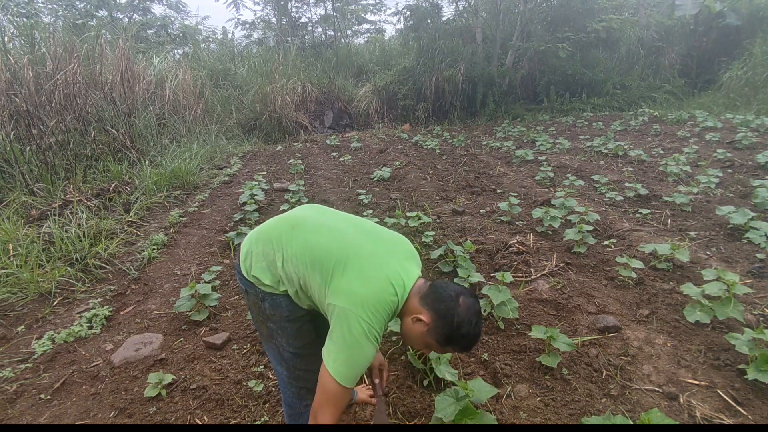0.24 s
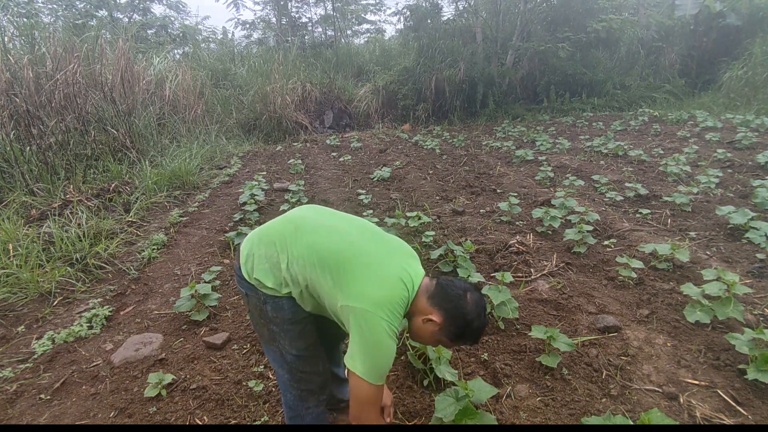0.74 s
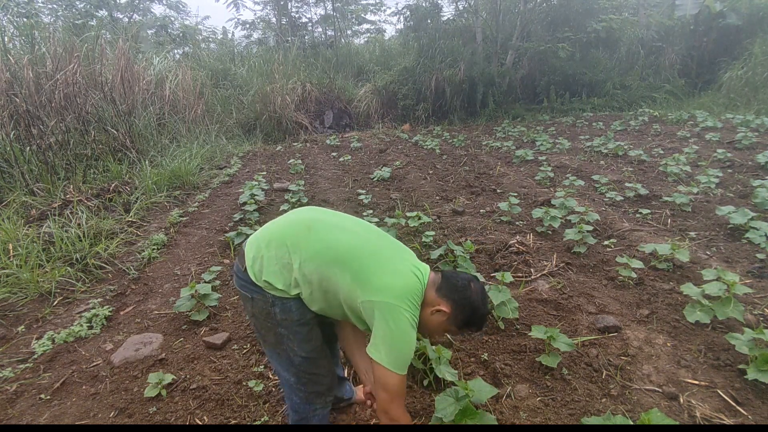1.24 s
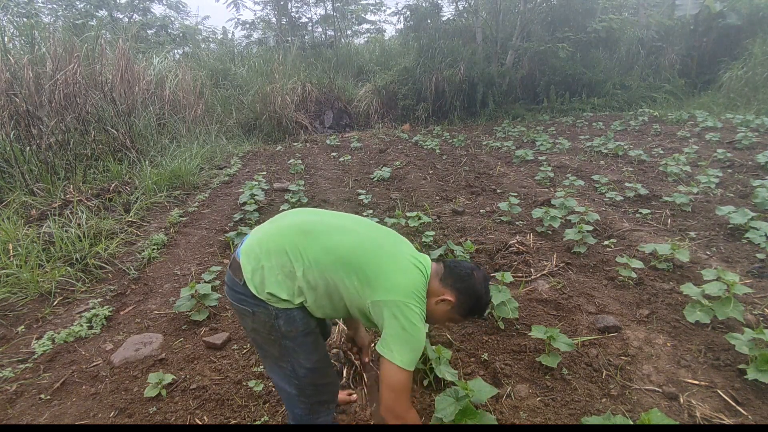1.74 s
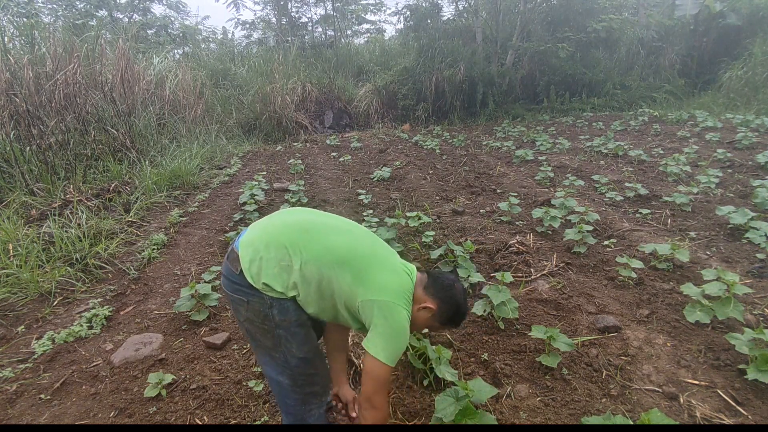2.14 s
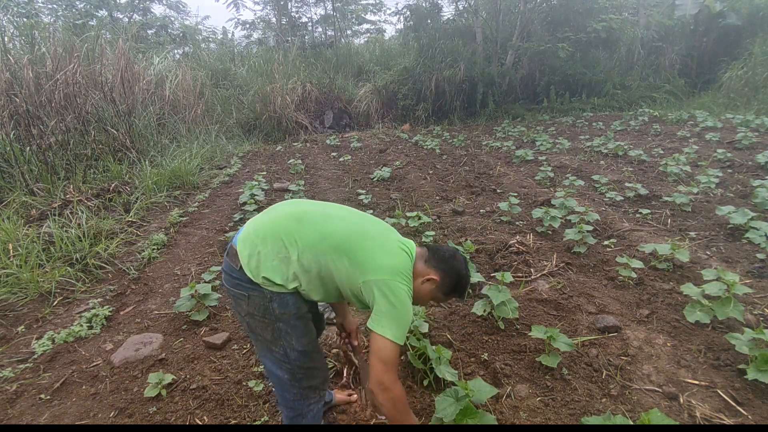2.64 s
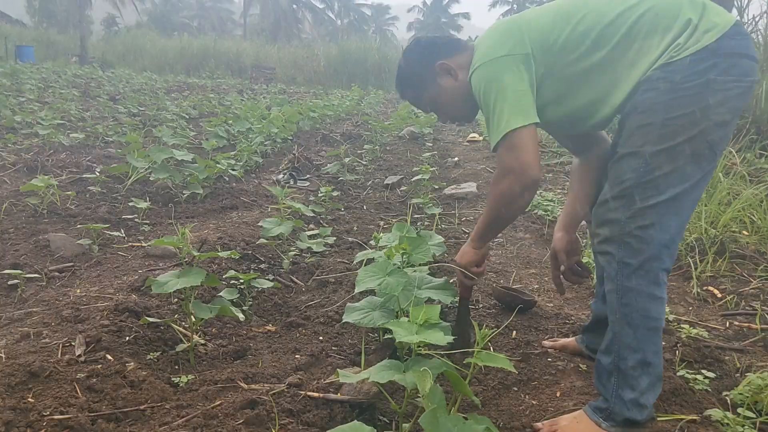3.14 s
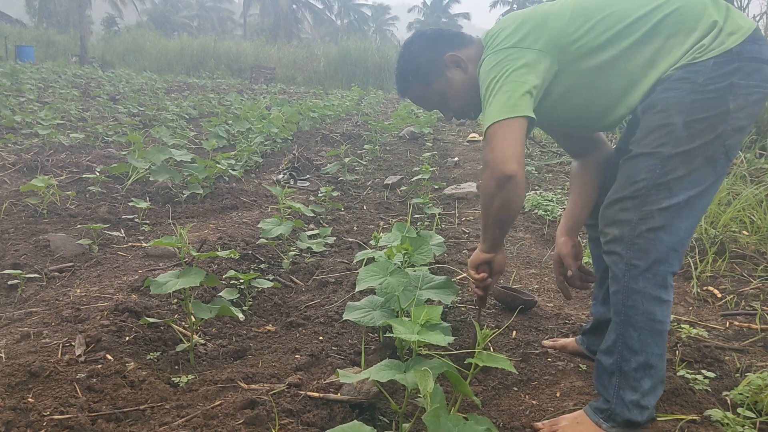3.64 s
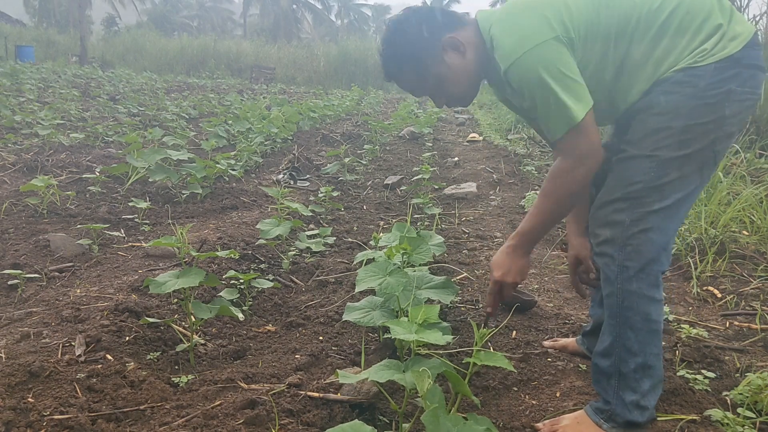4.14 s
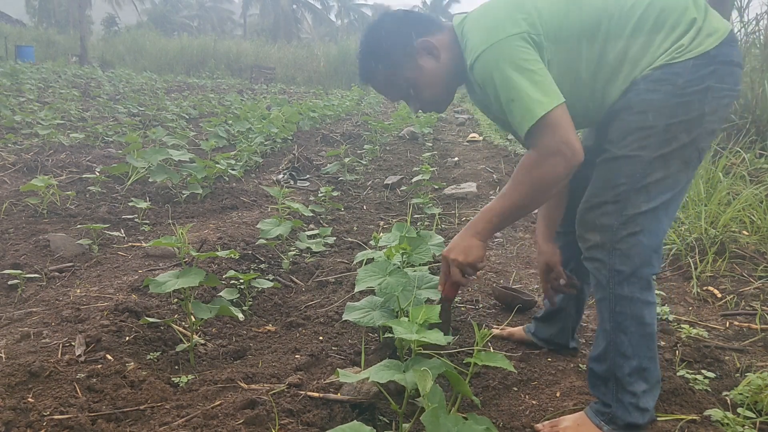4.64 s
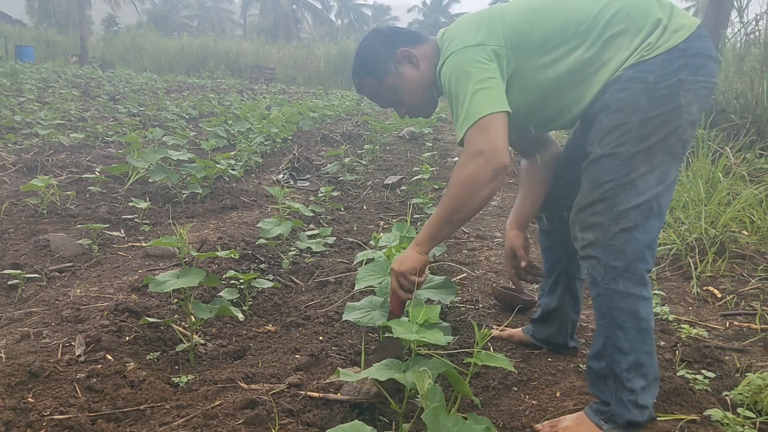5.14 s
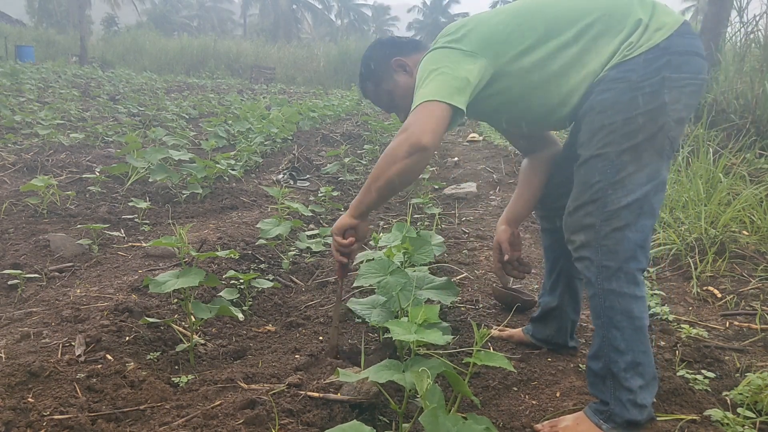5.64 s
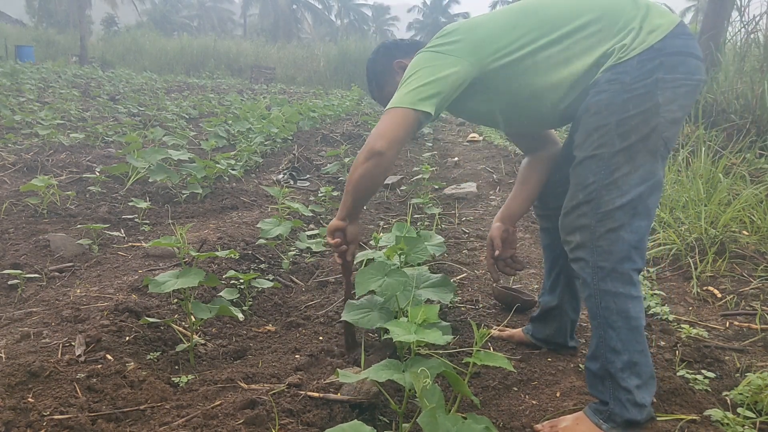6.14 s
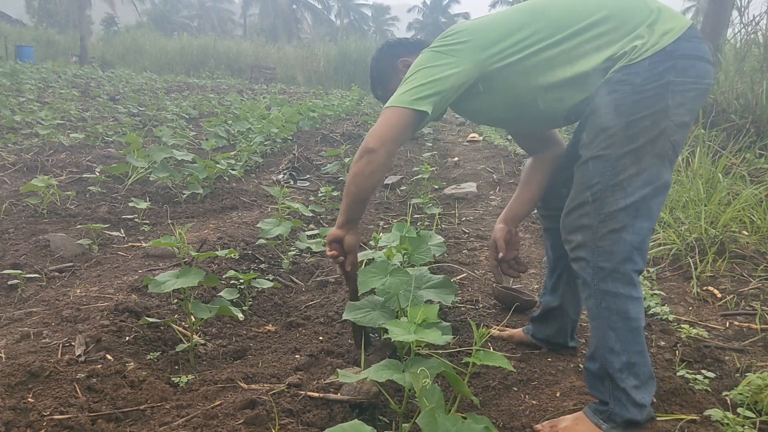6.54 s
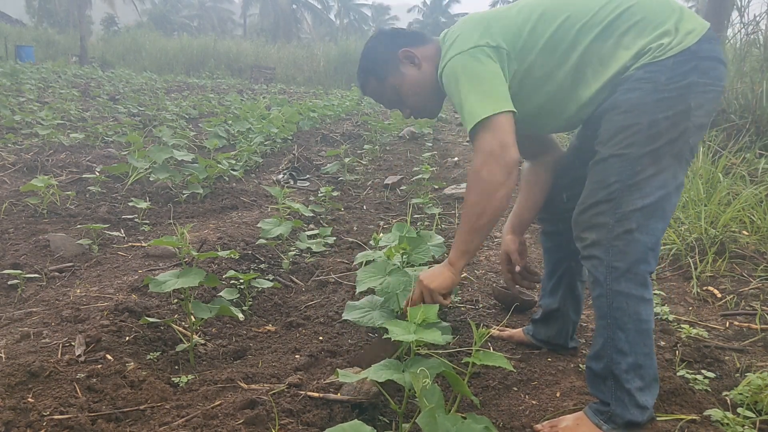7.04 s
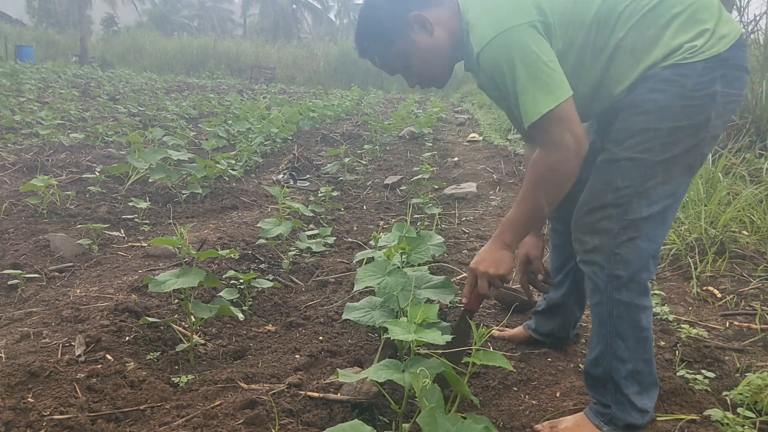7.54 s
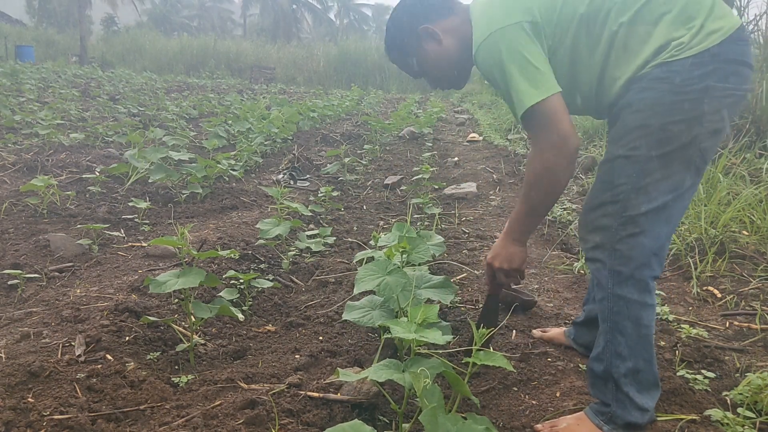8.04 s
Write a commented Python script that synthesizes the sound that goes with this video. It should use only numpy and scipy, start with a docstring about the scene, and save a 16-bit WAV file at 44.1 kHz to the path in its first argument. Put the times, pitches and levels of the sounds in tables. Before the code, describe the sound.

Steady rain on a vegetable field, with close drops thudding and ticking irregularly over leaf patter and a soft hiss.

```python
"""A vegetable field in steady rain, heard through the two microphone ports of a small camera out in it.
Drops land on and beside the camera, each a soft thud of sagging pitch, a hollow tap and a hard tick.
Close by, drops pat on leaves that give way. Further off, smaller ones patter on leaves and soil and
tiny droplets tick, over the hiss of the whole field and a low stir of air.
A brief silence marks an edit."""
import sys
import numpy as np
from scipy import signal
from scipy.fft import rfft, irfft
from scipy.io import wavfile
from scipy.ndimage import uniform_filter1d

SR = 44100
rng = np.random.default_rng(int(sys.argv[2]) if len(sys.argv) > 2 else 0)


def generate_wav(signal):
    """Clip the signal to [-1, 1] and save it as 16-bit WAV at the path in sys.argv[1]."""
    frames = np.transpose(np.atleast_2d(signal))
    scaled = np.clip(frames, -1, 1) * 32767
    pcm = np.round(scaled).astype(np.int16)
    wavfile.write(sys.argv[1], SR, pcm)


N = 365148
DROP_T = np.arange(1800) / SR  # seconds within one drop

# The soft push of a drop, a narrow plop. Each row: multiple of the thud pitch, level in dB.
THUD = [(.15, -45.5), (.35, -18), (.6, -1.5), (1, 2), (1.5, -1.5), (2.3, -14), (5, -46.5), (15, -71.5)]
# Resonance of the struck spot. Each row: multiple of the tap pitch, level in dB.
TAP = [(.12, -40.5), (.35, -15), (.6, -5.5), (1, 0), (1.55, -6), (2.3, -15.5), (4.5, -21.5), (12, -33.5)]
# Colour of the first contact. Each row: frequency in Hz, dB for a hard drop, dB for a soft one.
TICK = [(300, -13, -13), (2000, -4, -13.5), (4000, -2, -7.5), (6000, -1, -7), (9000, 2, 0.5),
        (16000, 2, -2)]


def near_drops(thud_db=1.9, tap_db=2.5, tick_db=0.83, knock_db=-18.0, detune=1.55, soft_db=9):
    """Drops right at the camera: a thud, a tap and a tick, each as strong as the struck spot allows."""
    # Each row: start in seconds, thud in dB, thud pitch in Hz, tap in dB, tap pitch in Hz, tick in dB,
    # splash against first contact in dB, left minus right in dB. The keywords trim the three levels.
    drops = [(0.2915, -32.5, 232, -48, 1100, -38, 4, -7), (0.3023, -22, 420, -39, 1730, -35, -2, 34),
             (0.321, -34.5, 466, -42, 950, -38, 0, 7), (0.3394, -43, 360, -38.5, 1860, -34.5, -3, 16),
             (0.3988, -42, 274, -35, 1750, -31.5, 0, -18), (0.4052, -51, 400, -42, 1910, -36, 14, -5),
             (0.4341, -30, 400, -39, 1120, -28, 4, 6), (0.4648, -35.5, 224, -36, 590, -32.5, 1, 0),
             (0.6836, -39, 297, -31, 1450, -36.5, -4, 20), (0.8103, -24, 333, -31, 570, -25.5, -5, -3.5),
             (0.9223, -26, 260, -32.5, 710, -34, -6, -9), (1.0065, -33, 251, -41, 950, -32.5, -3, 4.5),
             (1.2312, -29.5, 219, -37.5, 1300, -37, 15, 1), (1.3767, -42, 302, -34, 1460, -25, -14, 20),
             (1.462, -39.5, 282, -38.5, 654, -20.5, -9, 14), (1.4958, -44.5, 285, -43.5, 1150, -38.5, 4, 1),
             (1.7251, -36.5, 560, -31.5, 2040, -21, -9, 2), (1.7547, -34.5, 800, -25.5, 3640, -57, -13, 41),
             (1.802, -36, 337, -27, 950, -25.5, 2, -12), (1.8347, -43, 345, -33.5, 1780, -35, -1, -12),
             (1.949, -60, 310, -50, 3900, -22.5, 4, 13.5),
             (1.9631, -21.5, 216, -28.5, 1150, -32, 2.5, -1.5),
             (2.0932, -38.5, 644, -30, 2120, -26.5, -2, 13), (2.1444, -26, 230, -34, 1060, -30, 0, -1),
             (2.176, -34.5, 580, -24, 1700, -29, 9, 33), (2.306, -38.5, 186, -29.5, 1137, -33, -14, 0),
             (2.4376, -38, 433, -44, 1890, -30.5, 22, 18), (2.5666, -38, 392, -28, 1400, -27.5, -4, -17),
             (2.7924, -34.5, 326, -36, 617, -43, 0.5, 0), (2.8077, -39, 476, -29, 1410, -21, -7, 19),
             (2.9626, -57, 240, -44.5, 1070, -38.5, -10, -6), (2.9791, -53, 400, -40, 1750, -40, 2, -12),
             (2.9919, -45, 353, -34.5, 1060, -32, -24, -7), (3.025, -30.5, 222, -41, 1260, -32.5, 5, 0),
             (3.0413, -27.5, 660, -34.5, 3220, -32, -11, -27), (3.112, -33, 207, -42, 1330, -30, 18, -9),
             (3.1462, -45, 350, -43.5, 1310, -38, 0, -6), (3.2243, -51, 190, -40, 1140, -26, 0, -11),
             (3.3308, -21.5, 217, -31, 1160, -24, -8, -1), (3.4482, -52, 290, -44, 790, -32.5, 4, -11),
             (3.516, -39, 400, -33.5, 1650, -26.5, -8, 15), (3.5232, -49, 390, -34, 1890, -19.5, 2, 10.5),
             (3.5903, -32.5, 407, -49, 1650, -28, -2, -18), (3.6722, -56, 387, -42.5, 1280, -36, -1, 0.5),
             (3.731, -64, 350, -42, 3400, -47, -5, -13), (3.8063, -23.5, 192, -29, 600, -32.5, 2, -6.5),
             (4.02, -68, 300, -70, 2500, -35.5, -4, -5), (4.332, -35, 430, -38, 890, -30, 2, 28),
             (4.4525, -34.5, 270, -39.5, 600, -38, 3, 0.5), (4.5285, -21, 786, -29, 2200, -29, -16, 14),
             (4.6452, -51, 400, -44.5, 980, -33.5, -1, 0), (4.723, -30.5, 484, -31.5, 1750, -18.5, 4, 9.5),
             (4.761, -51, 270, -39, 910, -34, 6, -35), (4.784, -41.5, 220, -38, 610, -31, 6, -35),
             (4.911, -29, 536, -37.5, 1270, -34.5, 4, -8), (5.0216, -66, 240, -41, 1520, -34, -3, -16),
             (5.0367, -49, 293, -37.5, 1230, -22, -19, -6), (5.0578, -41, 367, -23, 1220, -50, -11, -7.5),
             (5.1276, -40, 453, -37, 1080, -30, -15, -25), (5.2782, -43.5, 142, -43.5, 600, -39, 5, -19),
             (5.3675, -49, 530, -35, 2020, -29.5, -12, 9.5), (5.413, -42.5, 180, -35, 1260, -35, 17, -5.5),
             (5.5885, -48, 430, -40, 920, -35, -3, 0), (5.6572, -50, 210, -44, 715, -40, 6, -16),
             (5.851, -30, 450, -31.5, 1590, -24, 2, 18), (5.8714, -38.5, 583, -36, 2170, -40, 21, -0.5),
             (5.9851, -36, 473, -26, 890, -37, -8.5, -26), (6.0072, -38, 520, -30.5, 1940, -20, -8, 16),
             (6.0177, -42, 230, -40, 1060, -32, 7, -7), (6.038, -42.5, 347, -50, 1000, -37, -2, -3),
             (6.0544, -44, 330, -36.5, 1140, -21.5, -6, -4), (6.1002, -27.5, 630, -29, 1980, -26, -14, 18),
             (6.1445, -36, 654, -31, 1050, -57, -10, 35), (6.1523, -32.5, 246, -47, 890, -31.5, 4, 0),
             (6.3031, -31, 245, -39, 1080, -28, 18, -0.5), (6.3104, -29.5, 493, -33.5, 1140, -18.5, 1, 24),
             (6.3331, -45, 190, -39, 640, -37, -5, -35), (6.3821, -19.5, 385, -30.5, 1180, -35, -6, -13),
             (6.4305, -42, 570, -28, 1085, -45, -15, 11), (6.4445, -37.5, 457, -34, 930, -53, -13, -24),
             (6.5754, -63, 241, -37.5, 1110, -24, 6, -7), (6.7369, -52, 261, -53, 2190, -20, -8, 16),
             (6.7448, -46, 250, -51, 930, -31.5, 4, -6), (6.7968, -44, 210, -47, 604, -34, 4, -3),
             (6.8176, -30.5, 380, -31.5, 1940, -34, -14, -26),
             (6.9532, -23.5, 223, -32, 1210, -27, 2, -11.5), (7.1005, -47, 490, -41, 1370, -32, -1, 10),
             (7.113, -39.5, 317, -41, 1230, -42, -1, 0), (7.1276, -33.5, 288, -41, 1350, -37, 1, -22),
             (7.234, -50, 400, -43, 2090, -33, -4, -8), (7.2514, -39, 197, -36, 646, -30.5, 13, -9),
             (7.267, -35.5, 650, -31, 1530, -24, -12, 17), (7.3153, -27, 352, -44, 1550, -38, -1, -22),
             (7.3482, -40, 560, -36, 1680, -31.5, -14, 14), (7.4405, -43, 274, -38, 840, -23.5, -8, -7),
             (7.4525, -35, 295, -25.5, 2420, -22, -12, 3), (7.5589, -31.5, 433, -36.5, 1800, -32, 8, 7),
             (7.5663, -43, 247, -44, 593, -40, 2, 9), (7.6012, -26, 405, -41, 1190, -46, -5, 24),
             (7.6925, -28.5, 380, -41, 1290, -55, -7, -19), (7.7849, -29, 626, -39, 2050, -26.5, -13, 18),
             (7.8361, -35.5, 230, -34, 1060, -35.5, -7.5, -0.5),
             (7.884, -35.5, 212, -31.5, 1140, -23, -2, 0), (7.9362, -40, 357, -36, 1100, -20, 4.5, -1),
             (7.9949, -36, 670, -27.5, 2030, -30, -1, 18), (8.0109, -21.5, 254, -31.5, 1390, -26.5, -7, -2),
             (8.041, -49, 390, -37, 1940, -25, -1, 35), (8.138, -46, 400, -30, 1670, -32, 5, -23),
             (8.1476, -44, 482, -63, 4000, -14, -16, 28), (8.1767, -41.5, 390, -53, 3150, -36, 7, -12),
             (8.248, -48, 245, -28.5, 1800, -29.5, 2, -32)]
    out = np.zeros((2, N))
    hard, soft = causal(TICK), causal(TICK, column=2)
    for start, low_db, thud_hz, mid_db, tap_hz, high_db, splash_db, side_db in drops:
        place, thud_lag, tap_lag = rng.random(3)
        near = plop(THUD, thud_hz)
        far = plop(THUD, thud_hz * detune ** (2 * place - 1))
        thud = np.array([near, far] if side_db > 0 else [far, near])
        thud = far_port_later(thud, side_db, thud_lag / thud_hz)
        thud += amp(knock_db) * min(300 / thud_hz, 1) ** 2 * mount_knock()  # deep thuds shake it most
        tap = strike(plop(TAP, tap_hz), splash_db, splash_s=0.0025)
        tap = far_port_later(tap, side_db, tap_lag / tap_hz)
        softness = np.clip((low_db - high_db) / soft_db, 0, 1)  # soft when the thud outweighs the tick
        tick = strike((1 - softness) * hard + softness * soft, splash_db, splash_s=0.0018)
        tick = far_port_later(tick, side_db, tap_lag * 0.0003)
        tick_side_db = 0.89 * side_db - 4.5  # follows the drop, leaning a little to the right
        add(out, start, pan(side_db) * (amp(low_db + thud_db) * thud + amp(mid_db + tap_db) * tap))
        add(out, start, pan(tick_side_db) * amp(high_db + tick_db) * tick)
    return out


def plop(shape, hz, damped_below_hz=400.0):
    """A brief resonance whose low edge rings longest, so the pitch sags; deep ones are broader."""
    steepness = min(hz / damped_below_hz, 1) ** .5
    spectrum = [(multiple * hz, db * steepness if multiple < 1 else db) for multiple, db in shape]
    return unit_hit(causal(spectrum, size=4096)[:len(DROP_T)])


def strike(colour, splash_db, splash_s):
    """One clean contact, then the water splashes; each port hears its own splash."""
    splash = np.exp(-DROP_T / splash_s) * rng.standard_normal((2, len(DROP_T)))
    force = amp(splash_db) * splash / np.linalg.norm(splash, axis=1, keepdims=True)
    force[:, 0] = 1  # the contact
    return np.array([unit_hit(signal.fftconvolve(side, colour)[:len(DROP_T)]) for side in force])


def mount_knock(hz=217.7, spread=0.393, rise_s=0.016, t60_s=0.052):
    """The camera mount rings on briefly after a drop, at a pitch that varies from hit to hit."""
    pitch = hz * np.exp(spread * (2 * rng.random((2, 1)) - 1))
    swing = np.sin(2 * np.pi * pitch * DROP_T) * (1 - np.exp(-DROP_T / rise_s))
    decay = np.exp(-np.log(1000) * DROP_T / t60_s)
    return np.array([unit_hit(side) for side in swing * decay])


def far_port_later(sound, side_db, delay_s):
    """The port away from the drop hears it later, through the casing."""
    late = np.pad(sound, ((0, 0), (int(abs(delay_s) * SR), 0)))[:, :sound.shape[1]]
    return np.array([sound[0], late[1]] if side_db > 0 else [late[0], sound[1]])


def leaf_pats(splash_db=2.0, splash_s=0.0017, tick_db=-44.5, tick_scatter_db=3.0):
    """Drops on the nearest leaves: the leaf gives way, so the pat is round and its tick is faint."""
    # Each row: start in seconds, level in dB, pitch in Hz, left minus right in dB.
    pats = [(0.702, -44, 360, -2), (0.726, -41.5, 1040, -2), (1.359, -40.5, 800, 5), (1.4, -38.5, 320, -7),
            (1.557, -39.5, 910, 6), (1.634, -44.5, 910, 6), (1.6571, -38, 1050, -9),
            (2.003, -41.5, 690, -19), (2.451, -39.5, 1040, 8), (3.195, -41, 540, -22),
            (3.216, -42, 418, -30), (3.2812, -37, 282, -17), (3.5368, -32.5, 1160, -26),
            (3.692, -43, 1020, -13), (3.8317, -30.5, 557, -4), (4.117, -40.5, 760, 0.5),
            (4.442, -40, 583, -20), (4.568, -41.5, 790, -19), (4.655, -41, 940, 18),
            (4.6897, -29.5, 860, 21), (4.7325, -34, 880, 13), (5.202, -43.5, 1020, 6),
            (5.2944, -33.5, 1560, -19), (5.3559, -33, 464, 25), (5.3847, -32, 770, 23),
            (5.4585, -40, 776, -32), (5.6225, -36, 1150, 24), (5.6826, -34, 900, 23),
            (5.9216, -34.5, 1200, 30), (6.172, -42, 820, -20), (6.192, -39, 1190, -22),
            (6.282, -37.5, 900, 30), (6.418, -40, 820, -13), (6.565, -40, 980, 15),
            (6.682, -46.5, 417, -15), (6.764, -41, 1050, -16), (6.8408, -32, 287, -15),
            (7.078, -40, 654, 12), (7.298, -35.5, 520, 4), (7.479, -32, 1000, 30), (7.5045, -44.5, 750, 4),
            (7.763, -40, 440, 0), (8.107, -40, 830, 10), (8.264, -42.5, 330, -3)]
    out, tick_colour = np.zeros((2, N)), causal(TICK)
    for start, db, hz, side_db in pats:
        lag, hardness = rng.random(), rng.uniform(-1.1, 1)
        pat = amp(db) * strike(plop(TAP, hz), splash_db, splash_s)
        tick = amp(tick_db + tick_scatter_db * hardness) * strike(tick_colour, splash_db, splash_s)
        add(out, start, pan(side_db) * far_port_later(pat + tick, side_db, .5 * lag / hz))
    return out


def patter(per_s=170, spread_db=4.5, tilt_db_per_octave=-3.5, surfaces=16):
    """Further off, small drops pat on leaves and soil, each surface at its own pitch."""
    # Strength of the patter. Each row: time in seconds, level in dB.
    strength = [(0, -51.5), (1, -54), (2.7, -53), (3.3, -47.5), (4.1, -59), (5.2, -53.5), (6, -52.5),
                (7, -52.5), (8.28, -46.5)]
    out = np.zeros((2, N))
    for hz in np.geomspace(230, 2100, surfaces):
        pat = strike(plop(THUD, hz), splash_db=-3.0, splash_s=0.004)
        pat *= amp(tilt_db_per_octave * np.log2(hz / 500))
        out += rainfall(pat, per_s / surfaces, spread_db)
    out += 0.36 * np.roll(out[::-1], 20, axis=1)  # each port hears the other side 20 samples late
    return unit(out) * level(strength)


def spray(per_s=45, spread_db=7.0, level_db=-53.0, kinds=6):
    """Tiny droplets tick all around, a little way off."""
    # Colour of a droplet. Each row: frequency in Hz, relative level in dB.
    droplet = [(400, -9.5), (1400, 10), (5000, 3.5), (9000, 5), (13500, -6), (15000, -16)]
    out, colour = np.zeros((2, N)), causal(droplet)
    for _ in range(kinds):
        tick = strike(colour, splash_db=9.0, splash_s=0.003)
        out += rainfall(tick, per_s / kinds, spread_db)
    return amp(level_db) * unit(out)


def rainfall(hit, per_s, spread_db):
    """One kind of impact falls at random on each side: many faint, a few strong."""
    sizes = amp(spread_db * np.minimum(rng.exponential(1, (2, N)), 3.5))
    lands = rng.random((2, N)) < per_s / SR
    return signal.oaconvolve(sizes * lands, hit, axes=1)[:, :N]


def far_rain(hiss_db=-45.5, flutter_db=1.0):
    """Countless drops across the field merge into a hiss that flutters slightly."""
    # Colour of the hiss. Each row: frequency in Hz, relative spectral density in dB.
    hiss = [(40, 10.5), (130, -2.5), (260, 9), (500, -11), (1000, -2), (2500, 2), (8500, 1.5),
            (11000, -1.5), (13800, 4.5), (14800, -24)]
    drift = uniform_filter1d(rng.standard_normal(N), size=1500)
    flutter = unit(uniform_filter1d(drift, size=700))
    return noise(hiss) * amp(hiss_db - flutter_db * flutter)


def air(width=0.42):
    """Stirring air makes a low rumble, mostly shared by the two ports."""
    # Colour of the rumble. Each row: frequency in Hz, relative spectral density in dB.
    rumble = [(8, 7.5), (22, -8), (32, -2), (42, 2), (60, -6), (100, -7.5), (200, -39)]
    # Strength of the rumble. Each row: time in seconds, level in dB.
    breeze = [(0, -53.5), (2.4, -57), (2.8, -58.5)]
    shared, apart = noise(rumble)
    return unit(np.array([shared + width * apart, shared - width * apart])) * level(breeze)


def amp(db):
    """Decibels to gain."""
    return 10 ** (np.asarray(db) / 20)


def unit(x):
    """Scales to rms 1."""
    return x / np.sqrt(np.mean(x ** 2) + 1e-20)


def unit_hit(x):
    """Scales a short sound to the energy of ten milliseconds at rms 1."""
    return x / np.sqrt(np.sum(x ** 2) / (SR / 100) + 1e-20)


def gain_at(spectrum, hz, column=1):
    """Gain from one dB column of a spectrum table, on a log-frequency axis."""
    table = np.transpose(spectrum)
    return amp(np.interp(np.log(hz + 1), np.log(table[0] + 1), table[column]))


def level(curve):
    """Gain at every sample from a curve of seconds and dB."""
    return amp(np.interp(np.arange(N) / SR, *np.transpose(curve)))


def pan(side_db):
    """Left and right gains of constant power."""
    return unit(amp([[side_db / 2], [-side_db / 2]]))


def add(mix, start_s, sound):
    """Mixes a stereo sound in at its start time."""
    part = mix[:, max(round(start_s * SR), 0):][:, :sound.shape[1]]
    part += sound[:, :part.shape[1]]


def causal(spectrum, column=1, size=1024):
    """Impulse response with the given spectrum that rings only after the blow (minimum phase)."""
    hz = abs(np.fft.fftfreq(size, 1 / SR))
    log_gain = np.log(gain_at(spectrum, hz, column))
    return np.fft.ifft(np.exp(np.conj(signal.hilbert(log_gain)))).real[:size // 2]


def noise(spectrum):
    """Two unrelated channels of steady noise with the given spectrum."""
    white = rfft(rng.standard_normal((2, N)))
    return unit(irfft(white * gain_at(spectrum, np.fft.rfftfreq(N, 1 / SR)), N))


def scene():
    """Near drops and leaf pats over patter, spray, hiss and rumble, in open air with no echo."""
    return near_drops() + leaf_pats() + patter() + spray() + far_rain() + air()


def record(dry, edit_from_s=2.763, edit_to_s=2.773, edge_hz=16600):
    """Each port colours the sound, which clips at full scale and is low-passed; a gap marks an edit."""
    # Response of the two ports. Each row: frequency in Hz, left gain in dB, right gain in dB.
    ports = [(102, 4, 4), (360, -3.5, 4.5), (534, 4, 8.5), (893, 4.5, 2.5), (1110, 4.5, 6.5),
             (1730, 2.5, 1.5), (3580, -3.5, 2), (4320, -6, 1), (6400, -14, 1.5), (7150, -6.5, -2.5),
             (7760, -7, 3), (8800, -3, 2.5), (10680, 4.5, -6), (12350, -5.5, -10.5), (13950, -14, -28),
             (15600, -27.5, -99)]
    left = signal.oaconvolve(dry[0], causal(ports, column=1))[:N]
    right = signal.oaconvolve(dry[1], causal(ports, column=2))[:N]
    heard = np.clip([left, right], -1, 1)
    heard[:, round(edit_from_s * SR):round(edit_to_s * SR)] = 0
    low_pass = signal.firwin(511, edge_hz, window=("kaiser", 9), fs=SR)
    return signal.oaconvolve(heard, low_pass[None], "same")


dry = scene()
out = record(dry)
generate_wav(out)
```